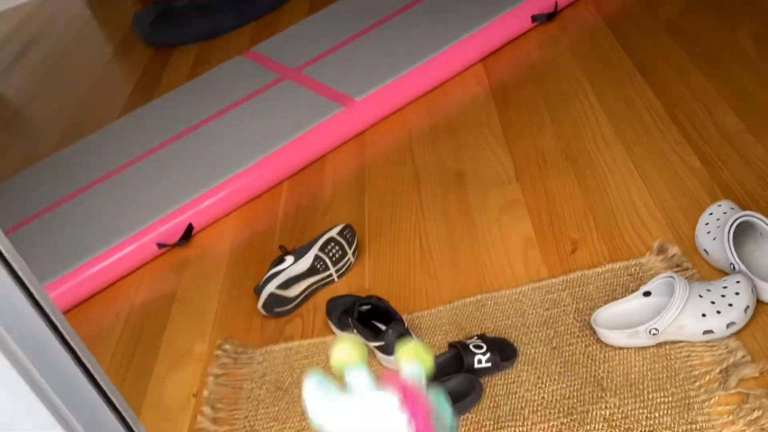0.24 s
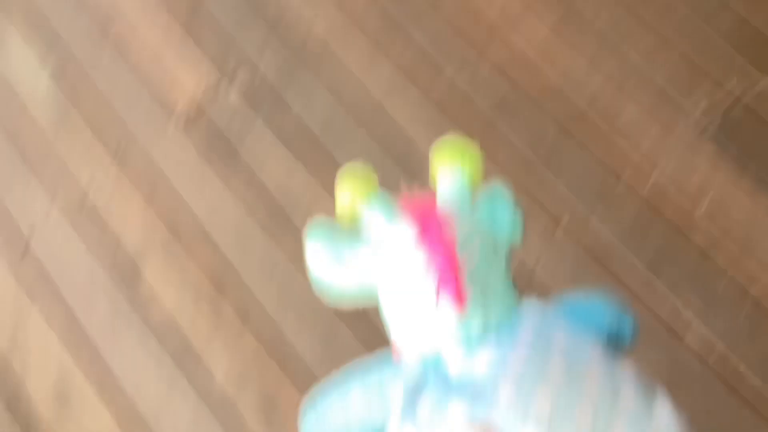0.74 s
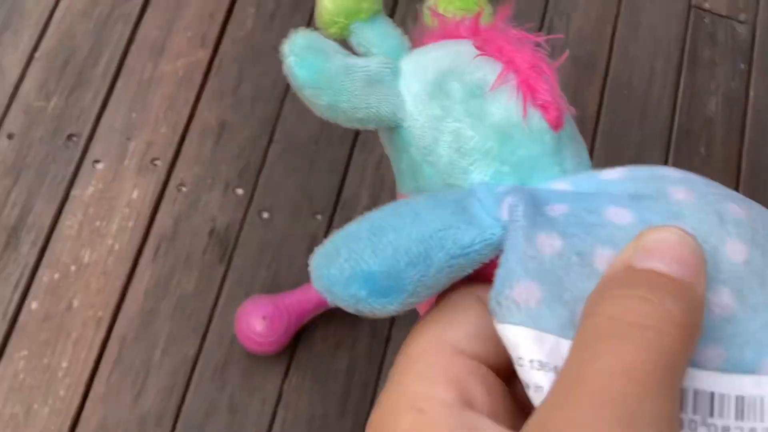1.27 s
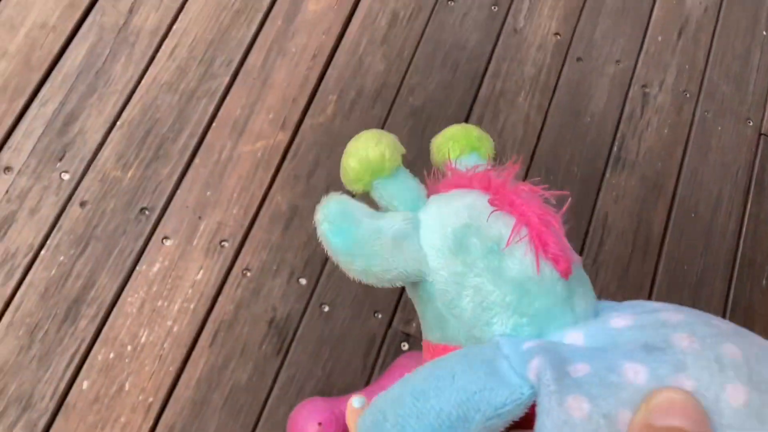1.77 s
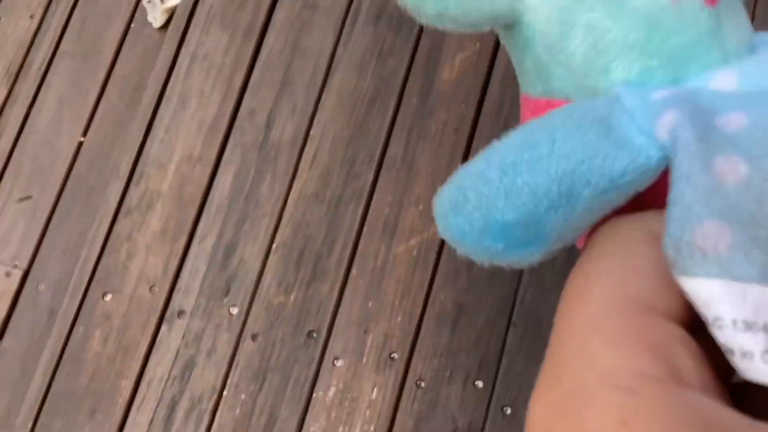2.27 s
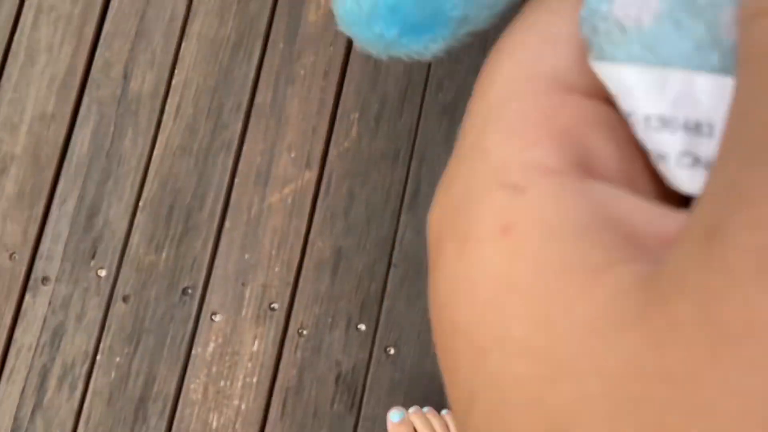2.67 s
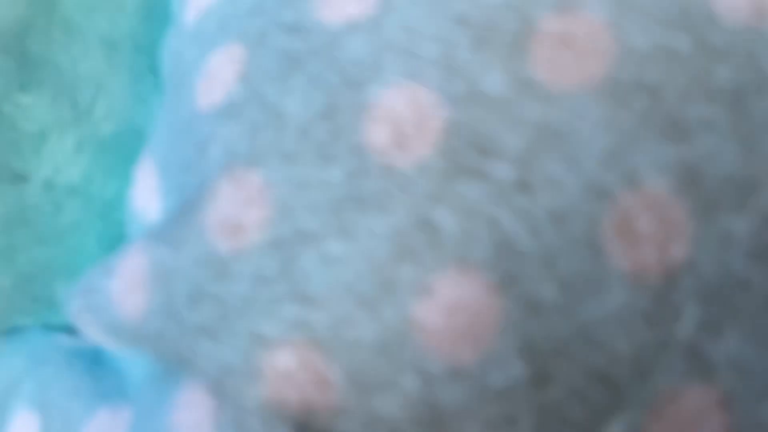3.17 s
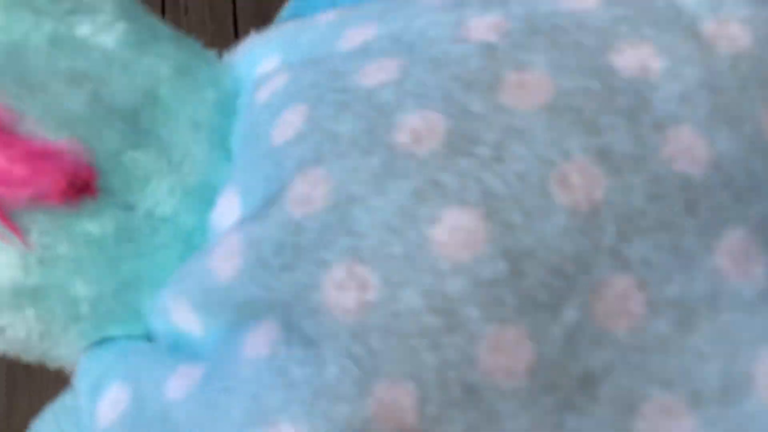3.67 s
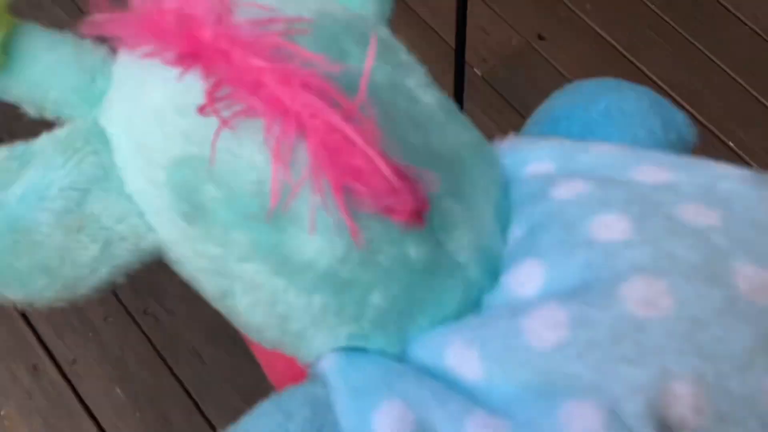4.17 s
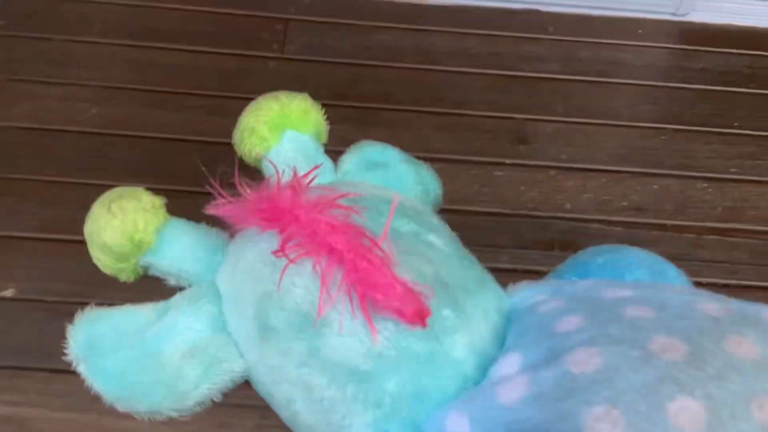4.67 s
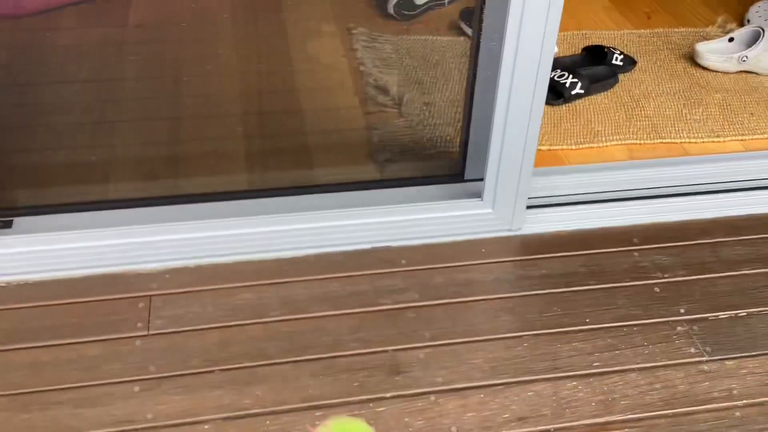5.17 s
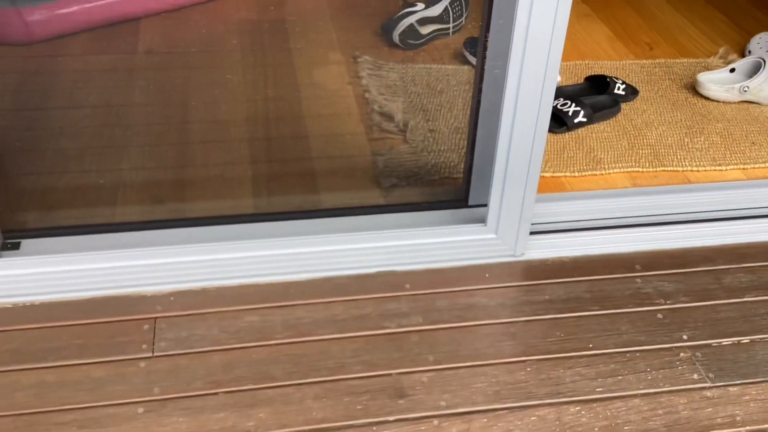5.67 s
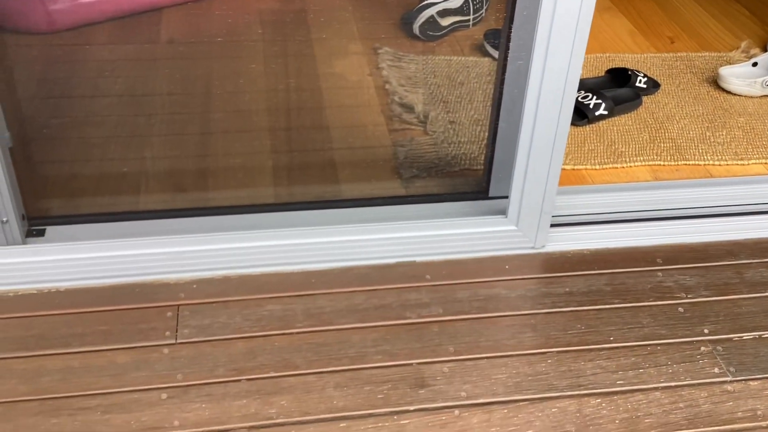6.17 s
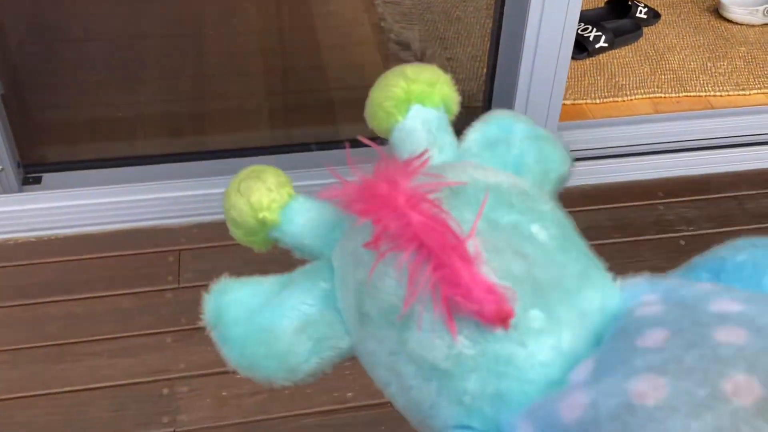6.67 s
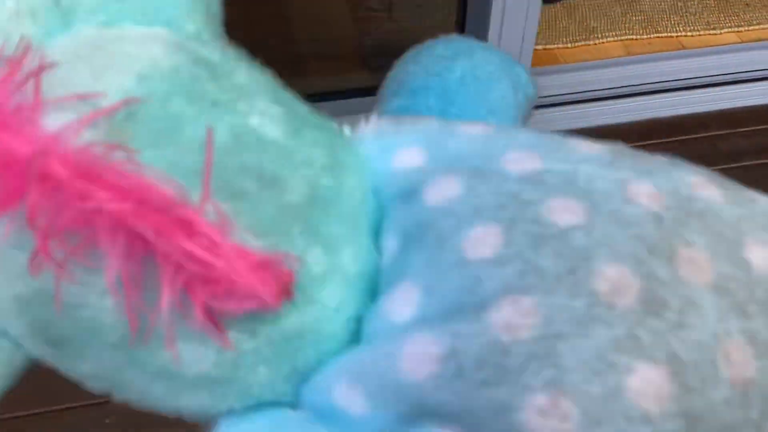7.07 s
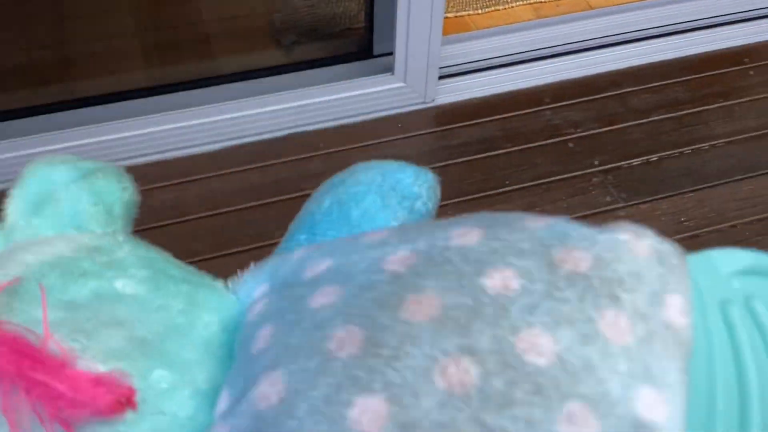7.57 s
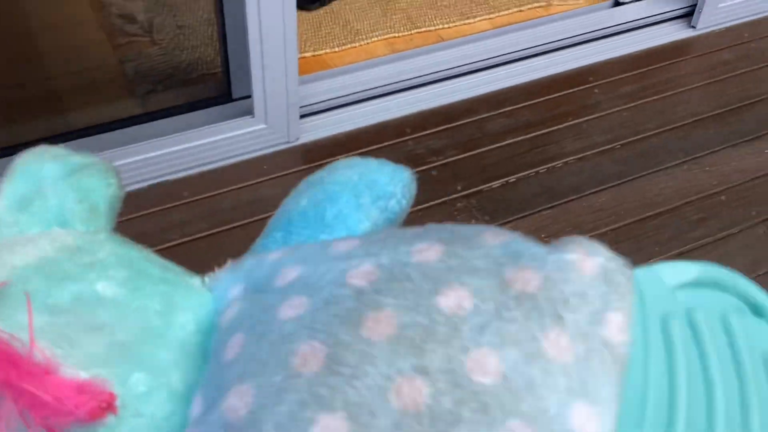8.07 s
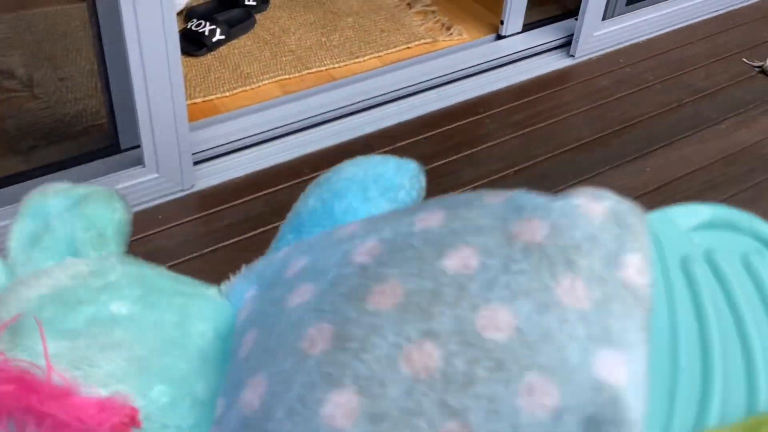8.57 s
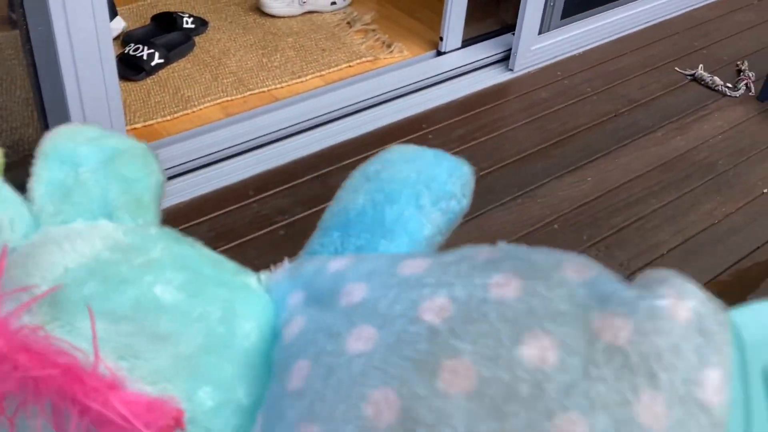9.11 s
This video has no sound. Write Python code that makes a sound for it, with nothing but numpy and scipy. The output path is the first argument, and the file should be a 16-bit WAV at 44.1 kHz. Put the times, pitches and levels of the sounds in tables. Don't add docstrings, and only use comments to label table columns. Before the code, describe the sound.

A quiet yard with a faint low hum, recorded close and dry on a phone over a wooden deck. From 0.3 to 0.9 s soft plush rustling with a few dull thumps and ticks. At 0.95 s a toy's reed squeaker starts: short, bright, nasal squeaks under a tenth of a second, lower then higher, four by 1.65 s. Rustle and a thump near 2 s, another pair at 2.5 and 2.7 s, then a cluster of bumps. From 3.2 to 4.8 s a rapid, louder seesaw of eleven squeaks, some pinched upward, with tiny high chirps. Four slower alternating squeaks run from 5.25 to 5.87 s, one lower at 6.15 s. A pause holds light ticks and rustles. A clipped high chirp at 7.6 s with a thump, then alternating squeaks about every 0.2 s from 7.9 s to the end at 9.3 s, each leaving a thin short echo.

```python
import sys
import numpy as np
from scipy import signal
from scipy.fft import rfft, irfft
from scipy.io import wavfile
from scipy.ndimage import uniform_filter1d

SR = 44100
rng = np.random.default_rng(int(sys.argv[2]) if len(sys.argv) > 2 else 0)


def log_audio(samples):
    frames = np.atleast_2d(samples).T
    limited = np.clip(frames, -1, 1)
    pcm = np.round(limited * 32767).astype(np.int16)
    wavfile.write(sys.argv[1], SR, pcm)


def linear_from_db(decibels):
    return 10 ** (np.asarray(decibels, float) / 20)


N = 411894
SPLIT_HZ = 1040


def evened(x):
    return x / np.sqrt(np.mean(x ** 2) + 1e-20)


def wander(shape, *spans):
    x = rng.standard_normal(shape)
    for span in spans:
        x = uniform_filter1d(x, size=span)
    return evened(x)


def read(points, hz):
    f, value = np.transpose(points)
    return np.interp(np.log(hz + 1), np.log(f + 1), value)


def add(mix, s, sound):
    part = mix[round(s * SR):][:len(sound)]
    part += sound[:len(part)]


def noise(colour, size, patchy_db, flicker_db):
    frames, hz = N // (size // 4) + 5, np.fft.rfftfreq(size, 1 / SR)
    real, imaginary, patches = rng.standard_normal((frames, len(hz), 3)).T
    patches = uniform_filter1d(patches, size=8, axis=0)
    patches = evened(uniform_filter1d(patches, size=20, axis=1))
    flicker = wander(frames, 3)
    level_db = read(colour, hz)[:, None] + patchy_db * patches + flicker_db * flicker
    z = (real + 1j * imaginary) * linear_from_db(level_db)
    return evened(signal.istft(z, nperseg=size, noverlap=3 * size // 4)[1][:N])


def squeak(row, press, grip, air):
    low_voice = [2.5, 1.2, 3.5, 0.06, 0.85, -0.5, -1.5, -6.5, -5.5, -6, -3.5, -9, -2.5, -10, -8.5, -10, -13,
                 -16.5]
    high_voice = [-1.5, 1.44, -2.5, -4, -15.5, -21, -25.5, -13.5, -4.5, -0.5, -6, -15, -14.5, -14.5]
    start, length, _, top_hz, _ = row
    echo_ms, echo, tube_db, top_db, body_db = grip
    voice_db, free_hz = (high_voice, 1360) if top_hz > SPLIT_HZ else (low_voice, 1120)
    t = np.arange(start - 0.026, start + length + 0.027, 1 / SR)
    level_db, hz = stroke(t, *row, *press)
    level_db = uniform_filter1d(level_db, size=30, mode="nearest")
    beating = np.clip((t - start) / 0.0047 + 1, 0, 1) ** 2
    hz = uniform_filter1d(hz, size=100, mode="nearest")
    hz = hz * (1 + 0.0012 * wander(len(t), 60))
    k = np.arange(1, len(voice_db) + 1)[:, None]

    weak_db = np.minimum(level_db - level_db.max() + 8.0, 0) * (t > start)
    colour_db = np.array(voice_db)[:, None] + 0.55 * weak_db * np.log2(k)
    tube_db = tube_db * np.exp(-(t - start) / 0.065)
    colour_db += tube_db * np.exp(-(np.log2(k * hz / 5750) / 0.17) ** 2)
    colour_db += top_db / (1 + (8500 / (k * hz)) ** 8)
    colour_db += body_db * np.exp(-(np.log2(k * hz / 3600) / 0.41) ** 2)
    colour_db += 1.5 * wander((len(k), len(t)), 500, 500)
    palm = 1 + np.clip(echo, -0.95, 0.95) * np.exp(-2j * np.pi * k * hz * echo_ms / 1000)

    overblown_db = np.clip(0.15 * (hz - 865), 0, 9) * (top_hz < SPLIT_HZ)
    overblown_db = overblown_db - 2.3 * np.maximum(weak_db, -12)
    shake = 0.008 * linear_from_db(overblown_db) * k * wander((len(k), len(t)), 70)
    band_limit = 1 + (k * hz / 15700) ** 40
    overtones = linear_from_db(colour_db) * palm * np.exp(1j * shake) / band_limit
    turn = 2 * np.pi * np.cumsum(hz) / SR
    ring = 0.19 * k ** 2
    tone = (overtones * np.exp(1j * (k * turn - ring))).real.sum(0)
    tone /= np.sqrt((abs(overtones) ** 2).sum(0) / 2)

    free = linear_from_db(-6.5) * np.sin(2 * np.pi * free_hz * t)
    air = air[round(t[0] * SR):][:len(t)]
    hiss = linear_from_db(overblown_db - 37) * air * (1 + 0.6 * np.cos(turn))
    leak = linear_from_db(level_db.max() - 42.5) * air * signal.windows.tukey(len(t), 0.4)
    return t[0], linear_from_db(level_db) * (beating * (tone + hiss) + (1 - beating) * free) + leak


def stroke(t, start, length, db, top_hz, fade, press, uneven):
    # (loudness lag behind press [share], level arch [dB],
    # pitch arch [share], flat start [share], pitch lost per dB of fade [share])
    low_stroke = (0.1083, -11, .14, .025, .006)
    high_stroke = (0.0955, -7.5, 0.0853, .015, .007)
    # (time [s], length [s], pitch gain [share], level gain [dB])
    flips = [
        (3.4912, .033, .125, -1),
        (3.81, .019, .115, -0.5),
    ]
    lag, arch_db, arch, flat, sag = high_stroke if top_hz > SPLIT_HZ else low_stroke
    u = np.clip((t - start) / length, 0, 1)
    fade_db = -13.5 * np.clip(1 - (1 - u) * length / fade, 0, 1) ** 2.0

    flip, lift_db = 0, 0
    for s, span, gain, up_db in flips:
        up, down = (t - s) / 0.008, (s + span - t) / 0.013
        gate = np.clip(np.minimum(up, down) + 0.5, 0, 1)
        off_centre = ((t - s) / span * 2 - 1).clip(-1, 1)
        gate = gate * (1 - 0.021 / gain * off_centre ** 2)
        flip = flip + gain * gate
        lift_db = lift_db + up_db * gate

    settling = flat * np.exp(-u * length / 0.0051)
    hz = top_hz * (1 - settling - uneven * arch * (u - press) ** 2 + sag * fade_db + flip)
    wake_db = -110 * np.clip((start - t) / 0.029, 0, 1)
    stop_db = -2500 * np.maximum(t - start - length, 0)
    swell_db = uneven * arch_db * (u - press - lag) ** 2
    return db + swell_db + fade_db + lift_db + wake_db + stop_db, hz


def whistle(length, from_hz, to_hz, db):
    hz = np.linspace(from_hz, to_hz, round(length * SR))
    return linear_from_db(db) * np.sin(2 * np.pi * np.cumsum(hz) / SR) * signal.windows.tukey(len(hz), 0.7)


def deck(x):
    # (frequency [Hz], t60 [s])
    decay_times = [(300, .35), (1000, 0.52), (3000, 0.36), (6000, .42), (10000, .36), (16000, 0.073)]
    # (frequency [Hz], level [dB])
    echo_colour = [(500, -2), (1500, -4), (4000, -4.5), (8000, -2.5), (15000, 0.5)]
    taps = np.zeros(SR // 2)
    at = np.arange(300, len(taps) - 20, 20)
    taps[at + rng.integers(0, 20, len(at))] = rng.choice([-1., 1.], len(at))
    hz, t, z = signal.stft(taps, SR, nperseg=256)
    early = linear_from_db(9 - 60 * t / 0.17)
    decay = linear_from_db(-60 * t / read(decay_times, hz)[:, None]) + early
    tail = signal.istft(z * linear_from_db(read(echo_colour, hz)[:, None]) * decay, SR, nperseg=256)[1]
    return signal.fftconvolve(x, tail / np.linalg.norm(tail))[:N]


def knocks():
    # (time [s], low thump [dB], bright tick [dB], thump pitch [Hz])
    touches = [(.54, -39.5, -59, 2300), (0.638, -69, -59, 250), (0.672, -62, -50, 250),
               (0.742, -52, -49, 250), (0.773, -40.5, -61, 253), (.845, -43, -61, 250),
               (.873, -46, -58, 249), (2.06, -49.5, -68, 149), (2.734, -39.5, -64, 408),
               (2.767, -40, -30, 303), (2.774, -34, -53, 112), (2.914, -52, -53, 205),
               (2.955, -40, -80, 235), (2.983, -47, -69, 223), (3.414, -45.5, -46, 350),
               (3.628, -36, -63, 402), (4.485, -53, -60, 350), (4.565, -42.5, -60, 360),
               (4.77, -50, -57, 353), (4.844, -47, -56, 404), (5.122, -56, -59, 399),
               (6.367, -65, -48.5, 301.6), (6.789, -66, -59, 304), (7.034, -47.5, -55.5, 700),
               (7.067, -49, -54, 301), (7.13, -58, -64, 700), (7.617, -37, -62.5, 409.5),
               (7.749, -44, -58, 256), (8.157, -42.5, -66, 396), (8.539, -48.5, -62, 172)]
    out, t = np.zeros(N), np.arange(2500) / SR
    grain = rng.standard_normal((len(touches), len(t))) * linear_from_db(-60 * t / 0.018)
    tick_band = signal.butter(3, [900, 5200], "band", fs=SR, output="sos")
    ticks = signal.sosfilt(tick_band, grain)
    for (s, thump_db, tick_db, hz), tick in zip(touches, ticks):
        thump = np.sin(2 * np.pi * hz * t * (1 - 6 * t)) * np.exp(-t * hz / 1.0)
        add(out, s, linear_from_db(thump_db) * thump + linear_from_db(tick_db) * tick / abs(tick).max())
    return out


def plush():
    # (frequency [Hz], level per Hz [dB])
    rustle_colour = [(300, -20), (800, -4.5), (2300, -3.5), (3300, -12), (5900, -9.5), (6500, -19.5),
                     (11000, -17.5), (16500, -27.5)]
    # (time [s], level [dB])
    arm_moves = [(0, -75.5), (.93, -64.5), (1.8, -74), (2.6, -72.5), (4.8, -75), (5.05, -90), (6.42, -73),
                 (6.5, -89), (7.55, -85), (9.34, -80)]
    # (time [s], length [s], level [dB])
    slides = [(0.276, 0.18, -70), (0.51, 0.34, -69.5), (0.778, 0.4, -63.5), (1.99, 0.12, -66),
              (2.12, 0.26, -73), (2.65, 0.31, -64), (6.622, 0.068, -73.5), (6.74, .26, -81),
              (7.03, 0.13, -81), (7.305, 0.086, -73.5)]
    rustle = linear_from_db(np.interp(np.arange(N) / SR, *np.transpose(arm_moves)))
    for s, length, db in slides:
        add(rustle, s, linear_from_db(db) * signal.windows.tukey(round(length * SR), 0.7))
    return noise(rustle_colour, size=512, patchy_db=2.8, flicker_db=1.5) * rustle


def yard():
    # (frequency [Hz], level per Hz [dB])
    yard_colour = [(30, -34.5), (48, -10.5), (62, 2), (80, -4.5), (105, -6), (200, -10), (480, -19),
                   (1200, -21.5), (2500, -34.5), (5900, -40), (6400, -47.5), (11000, -42.5), (16500, -53.5)]
    # (time [s], level [dB])
    yard_loudness = [(0, -60.5), (3, -61), (5.1, -66.5), (7.3, -65.5), (9.34, -65.5)]
    loudness = linear_from_db(np.interp(np.arange(N) / SR, *np.transpose(yard_loudness)))
    return noise(yard_colour, size=4096, patchy_db=3.0, flicker_db=0.16) * loudness


def scene():
    # (time [s], length [s], level [dB], reed pitch [Hz], fade [s])
    squeaks = [(0.9504, 0.094, -22.5, 855, 0.036), (1.1406, .08, -18.5, 1121, 0.01),
               (1.4078, .059, -21.5, 853.5, 0.052), (1.589, 0.068, -20, 1107, 0.013),
               (2.4776, 0.076, -22.5, 842.2, 0.022), (2.6729, .064, -20.5, 1096, 0.034),
               (3.189, .036, -17.5, 845, .027), (3.3484, 0.062, -13.5, 1109, .018),
               (3.4635, 0.082, -13.5, 909, .03), (3.6392, 0.075, -16, 1110, 0.018),
               (3.7784, 0.071, -13.5, 912, 0.023), (3.9547, 0.08, -15.5, 1118, .02),
               (4.0918, .066, -16.5, 909.3, 0.0069), (4.2744, 0.065, -16, 1119, 0.039),
               (4.4323, .055, -18.5, 876.5, 0.0085), (4.607, .055, -16.5, 1113, 0.026),
               (4.734, .041, -18, 900.6, .006),
               (5.2538, .071, -19.5, 1084, 0.011), (5.4305, 0.072, -20, 866.4, 0.024),
                    (5.6249, 0.051, -21, 1081, 0.051), (5.803, .069, -19, 874, 0.014),
                    (6.1573, 0.071, -20, 874, .04), (7.5842, 0.016, -13.5, 1122, 0.0067),
                    (7.8969, .075, -17.5, 860.6, 0.038), (8.0879, .044, -14, 1128, 0.0044),
                    (8.302, 0.065, -18, 844.6, 0.032), (8.5021, .037, -17.5, 1097, 0.0057),
                    (8.7033, 0.069, -19, 859.6, 0.044), (8.9012, 0.047, -20, 1088, 0.012),
                    (9.0873, 0.065, -21, 851, 0.034), (9.2799, .031, -20, 1089, 0.021)]
    presses = [(.25, 0.54), (0.32, 1.1), (.12, 0.66), (0.4, 1.2), (0.41, 1.1), (.4, 1.5), (.15, 1.1),
               (0.31, 1), (0.54, 1.2), (0.17, .8), (.45, 1.2), (0.14, 0.59), (0.43, 1.6), (.25, 0.57),
               (0.51, .7), (.25, .8), (1, 0.35),
               (0.036, 0.79), (0.38, 1.1), (0.13, 1.16), (0.24, .7), (0.349, 0.906), (.45, 1.1),
                    (0.38, 1), (0.3, 0.65), (.2, 0.67), (.3, 0.61), (.35, 0.91), (0.294, 0.96),
                    (0.332, 0.796), (0.205, 1.3)]
    # (palm echo [ms], echo gain [+-1], tube band [dB], top band [dB], body band
    # [dB])
    grips = [(.336, 0.28, -10.5, 5, -0.2), (.12, -0.39, -2.1, 0, 2.5), (.056, .37, 7, 3.7, 1.5),
             (.273, .66, 2, -0.4, -.5), (0.2564, -1.3, -2.5, -4, -0.5), (.54, .37, 10, 2.5, 1.7),
             (.037, 0.77, -2, 22, -4.5), (.102, 0.65, -2, 7, 5), (.36, .35, 1.5, 3.5, -2),
             (1, .13, 13, 5, -2.5), (0.42, 1, 5, 3.5, -3.3), (0.09, -0.073, 18, 5.5, -7.5),
             (0.077, 0.53, 5.5, 9.5, 5.5), (0.14, 1, 15.5, 9, 9.5), (.57, 0.28, 1, 9, -3.5),
             (.237, -.23, 12.5, 5, -2.5), (0.1245, 0.41, -2, 10, 7.5),
             (0.032, .8, 0.5, 14.2, 3.9), (.219, 0.25, 8.5, 3.4, .3), (0.052, 0.49, 11, 6, 5.6),
                  (.213, .25, 10.5, 4.8, 1.6), (.044, 0.042, 9.5, 1.3, 1.6), (0.3, 0.12, 3, .4, 2.7),
                  (.17, -0.26, -3.5, 5.4, 2.5), (.312, .1, -0.5, 5.2, 2.8), (0.86, 0.3, -1, 14, 11),
                  (0.368, -.2, -6, 4.2, 1), (0.58, -.11, 1, 9.8, 2.3), (0.14, .29, -5, 5.3, 4.5),
                  (0.595, -0.12, 3, 9.7, 0.11), (0.21, 0.11, -8, 1.5, 1.1)]
    # (frequency [Hz], level per Hz [dB])
    hiss_colour = [(400, -32), (1000, -17.5), (3000, 13), (6000, -0.5), (8000, -10), (11000, 3),
                   (14000, -17), (16500, -25)]
    # (time [s], length [s], from [Hz], to [Hz], level [dB])
    whistles = [
        (3.448, 0.015, 6000, 6180, -48),
        (3.768, 0.0081, 6010, 6000, -54),
        (4.922, 0.033, 1298, 1330, -63),
        (6.645, 0.03, 1190, 1000, -62),
    ]
    toy, sent = np.zeros(N), np.zeros(N)
    air = noise(hiss_colour, size=512, patchy_db=0.0, flicker_db=2.0)
    for row, press, grip in zip(squeaks, presses, grips):
        s, sound = squeak(row, press, grip, air)
        add(toy, s, sound)
        send_db = -21.5 - 0.7 * (row[2] + 18.5)
        add(sent, s, linear_from_db(send_db) * sound)
    for s, *shape in whistles:
        add(toy, s, whistle(*shape))
    mono = toy + deck(sent) + knocks() + plush() + yard()
    return np.array([mono, mono])


def fuzz_blocks(out):
    # (time [s], from [Hz], to [Hz])
    blocks = [(.981, 9500, 10800), (2.7, 11200, 15200), (3.791, 6800, 15200), (3.998, 14500, 15800),
              (4.116, 10200, 15800), (4.465, 14300, 15800), (5.835, 6500, 7500), (5.835, 14400, 15800),
              (8.109, 9500, 10800), (8.109, 13000, 14300), (8.318, 7500, 9000), (8.318, 12300, 14500)]
    fade, hz = np.sin(np.pi * np.arange(2048) / 2048), np.fft.rfftfreq(2048, 1 / SR)
    for s, lo_hz, hi_hz in blocks:
        at = round(s * SR) - 1024 + np.arange(2048)
        lines = rfft(out[:, at] * fade) * (hz > lo_hz) * (hz < hi_hz)
        power = uniform_filter1d(abs(lines) ** 2, size=30, axis=1) * (abs(lines) > 0)
        fuzz = np.sqrt(power) * np.exp(2j * np.pi * rng.random(lines.shape))
        swing = np.sqrt(abs(uniform_filter1d(out[:, at] ** 2, size=100, axis=1)))
        fuzz = linear_from_db(2.0) * irfft(fuzz) * swing / np.median(swing)
        out[:, at] += (fuzz - irfft(lines)) * fade
    return out


def roll_off(x):
    return signal.sosfilt(signal.butter(12, 16970, fs=SR, output="sos"), x)


def record(dry):
    out = signal.sosfilt(signal.butter(3, 45, "high", fs=SR, output="sos"), dry)
    out = signal.oaconvolve(out, signal.firwin(255, 16100, fs=SR)[None], "same")
    out = fuzz_blocks(out)
    return roll_off(out)


dry = scene()
out = record(dry)
log_audio(out)
```